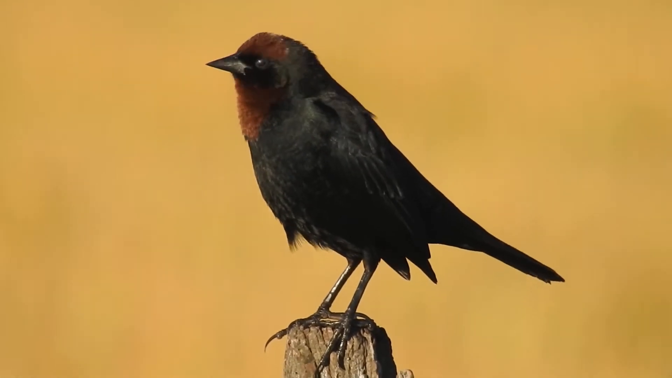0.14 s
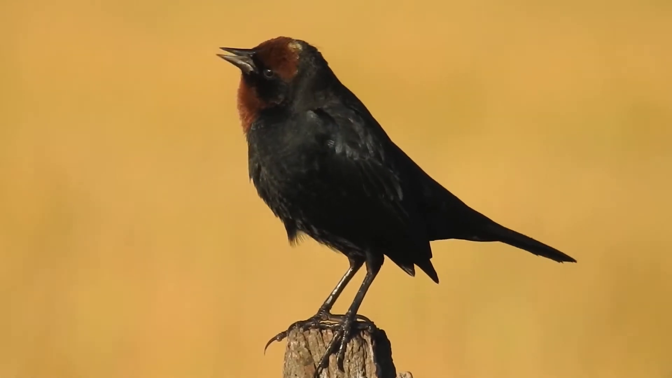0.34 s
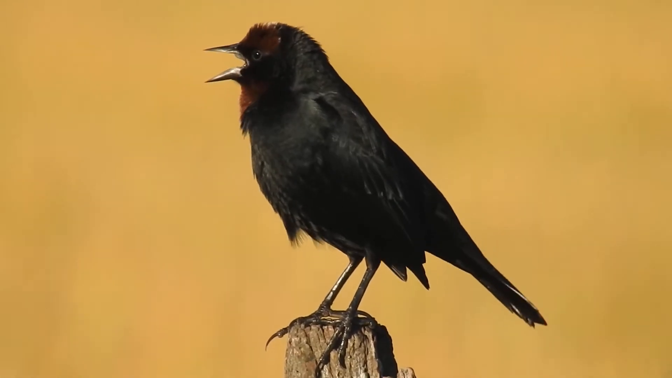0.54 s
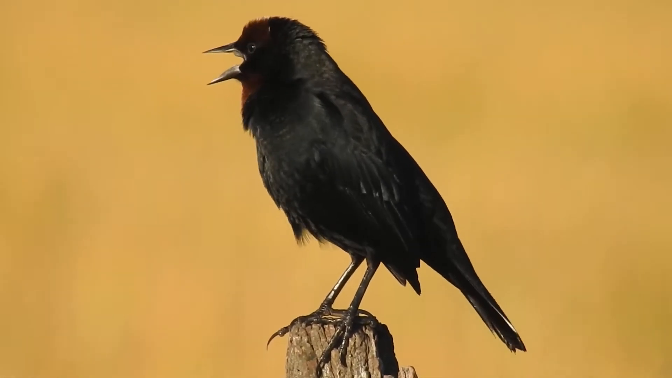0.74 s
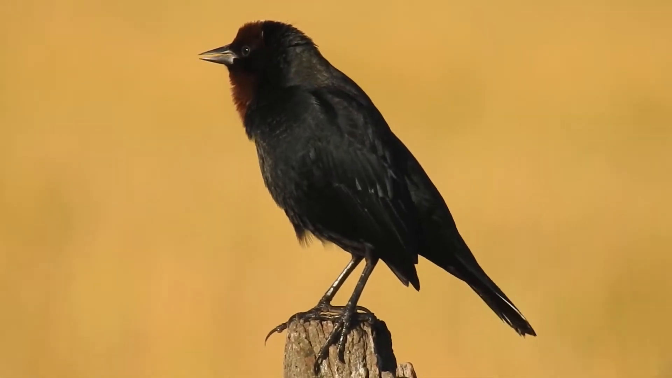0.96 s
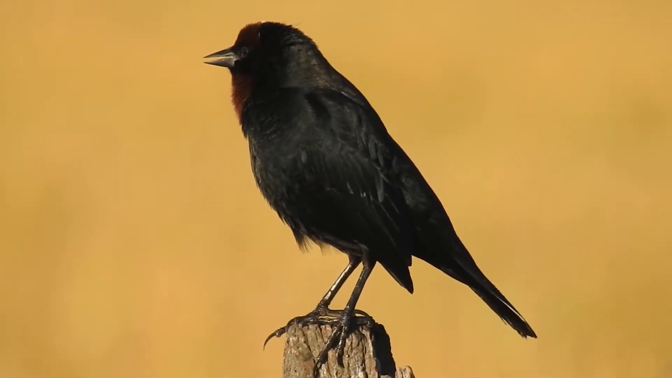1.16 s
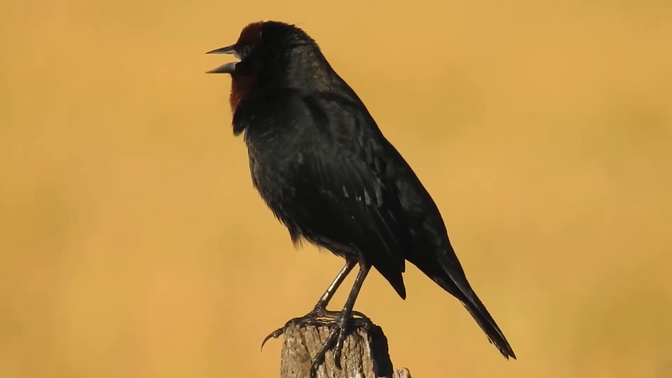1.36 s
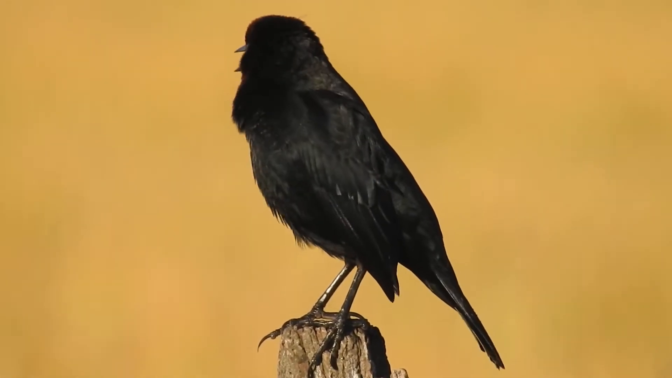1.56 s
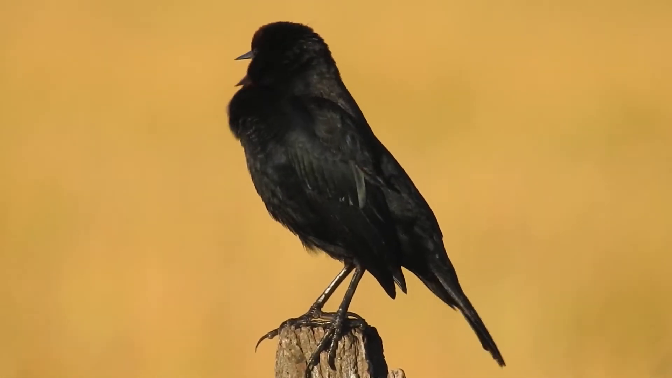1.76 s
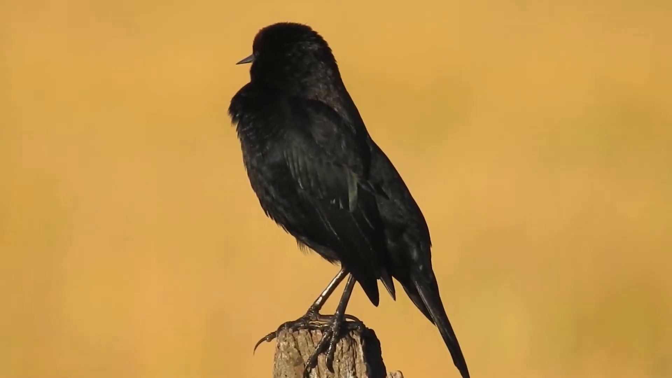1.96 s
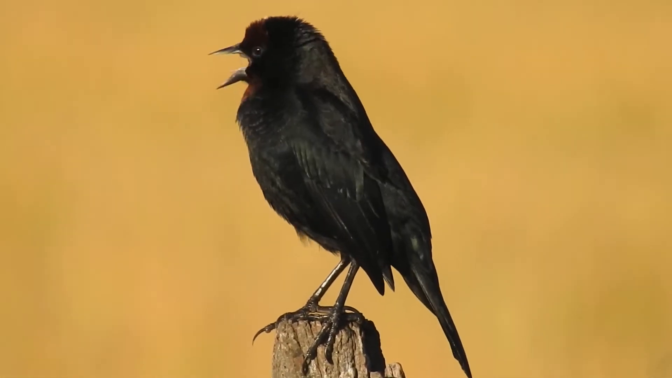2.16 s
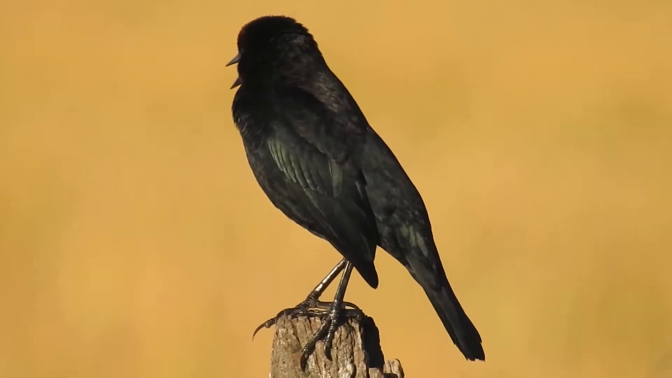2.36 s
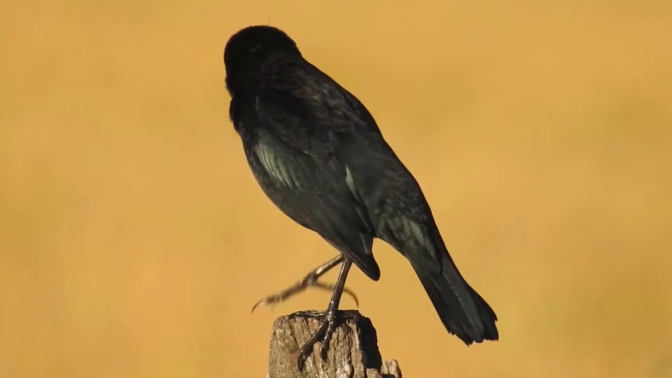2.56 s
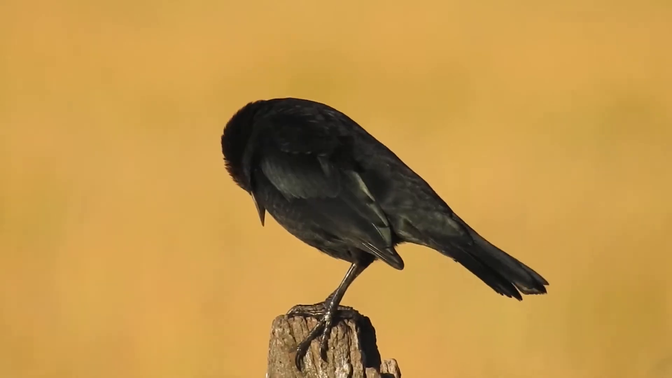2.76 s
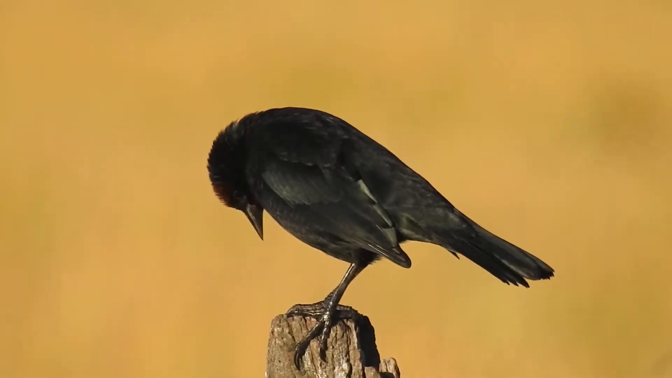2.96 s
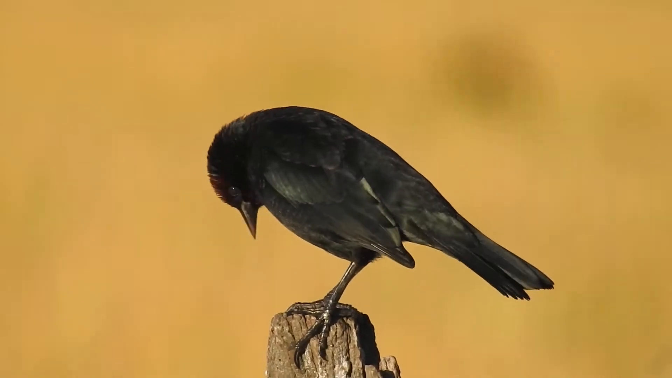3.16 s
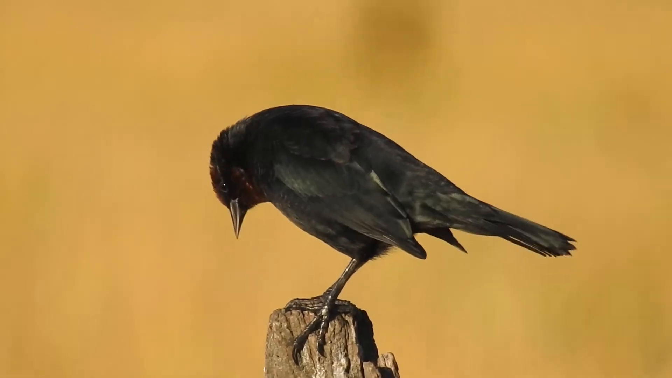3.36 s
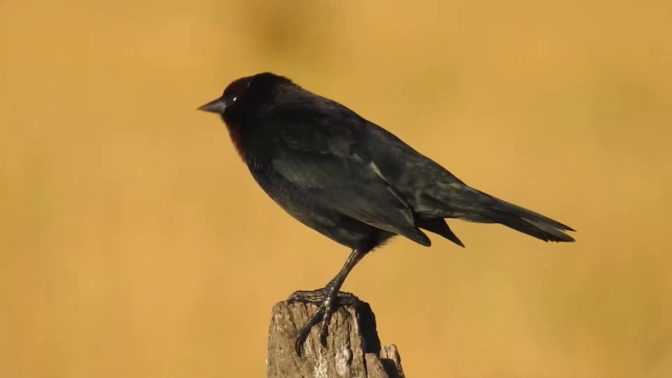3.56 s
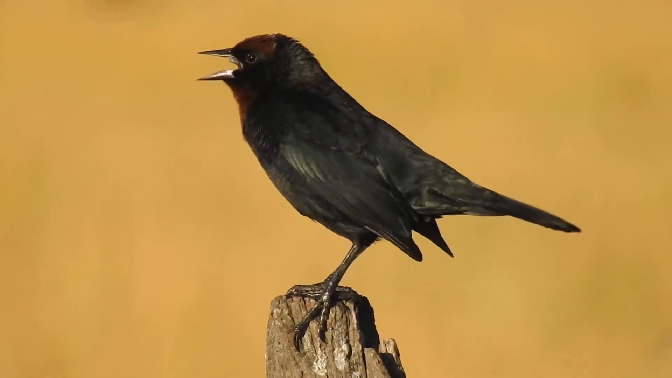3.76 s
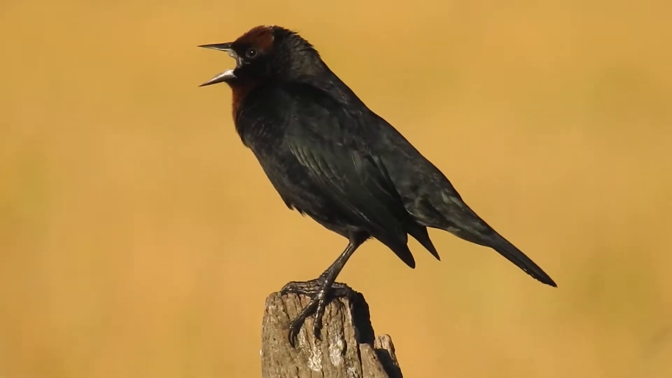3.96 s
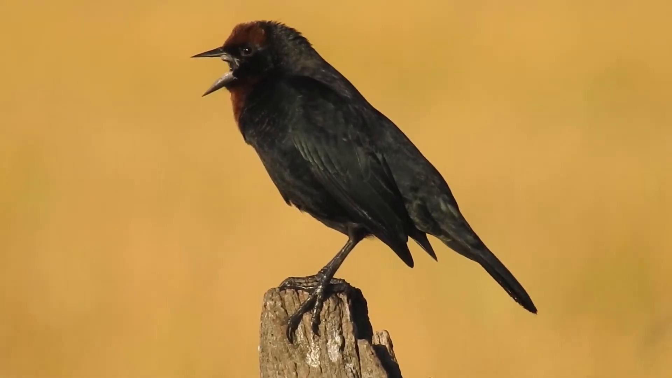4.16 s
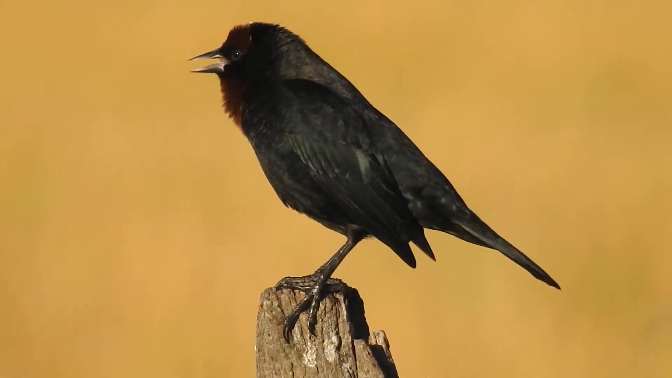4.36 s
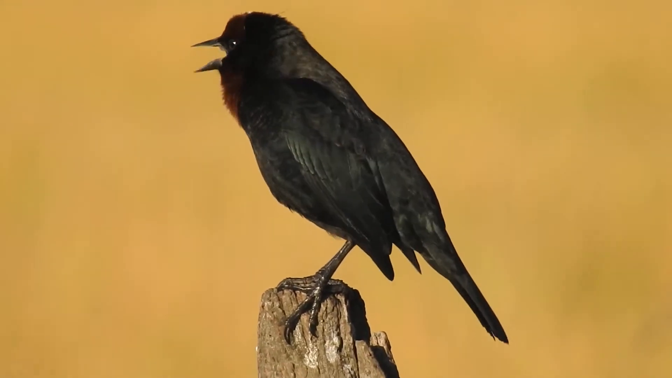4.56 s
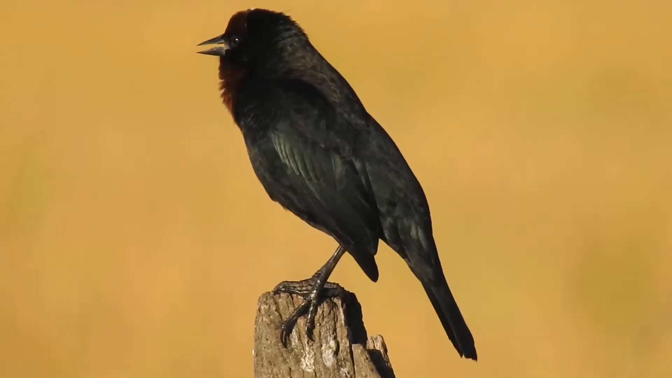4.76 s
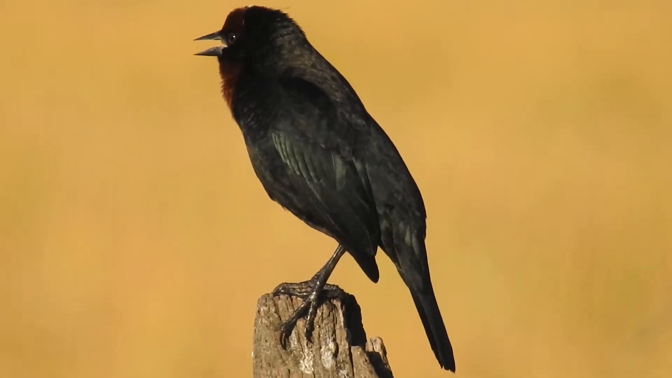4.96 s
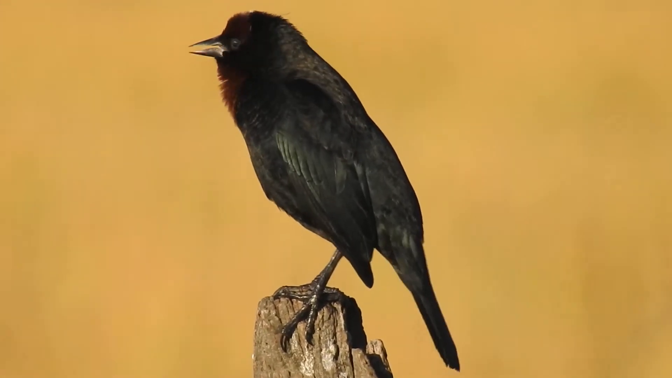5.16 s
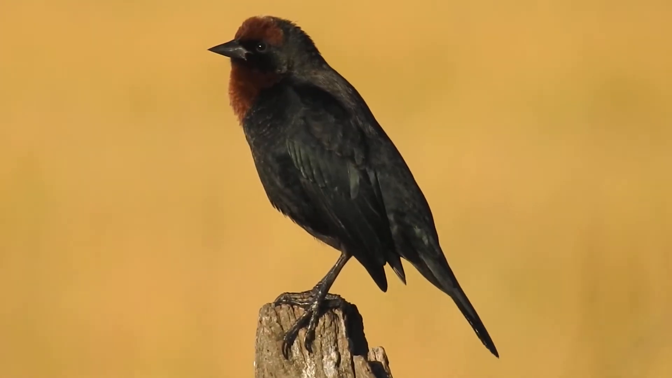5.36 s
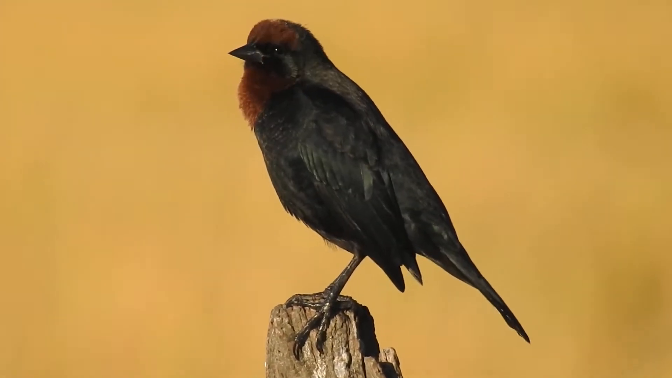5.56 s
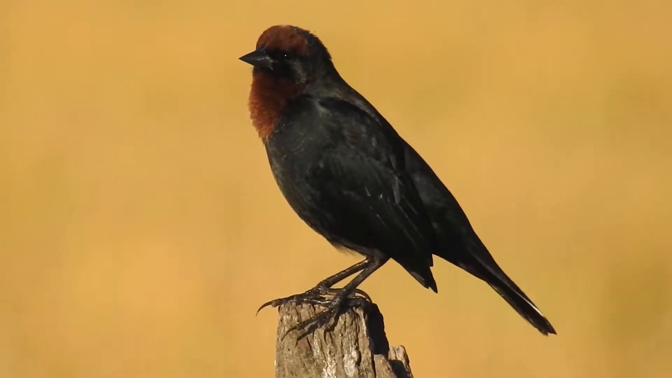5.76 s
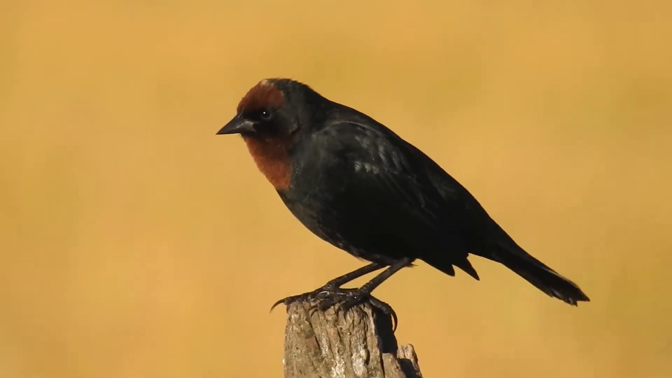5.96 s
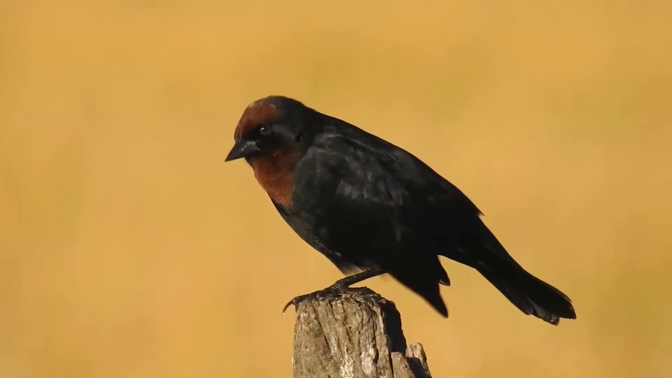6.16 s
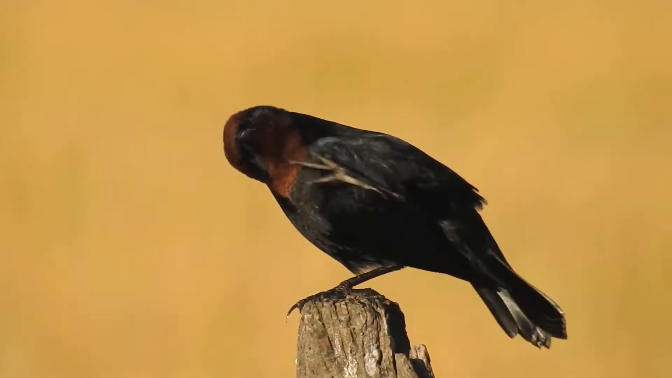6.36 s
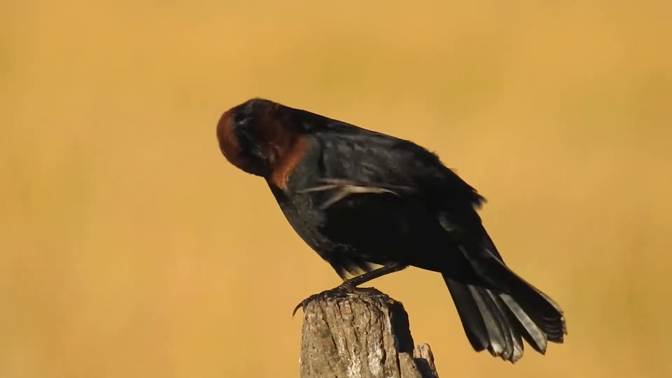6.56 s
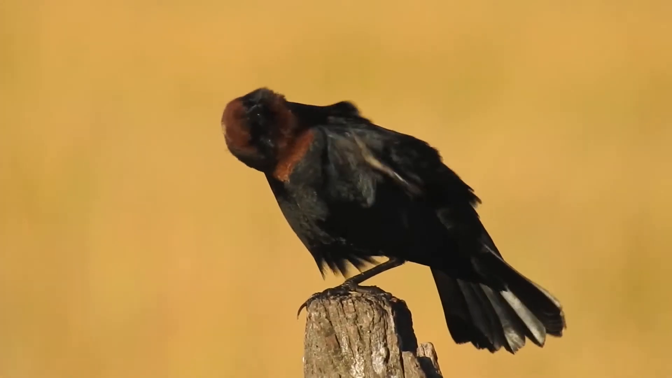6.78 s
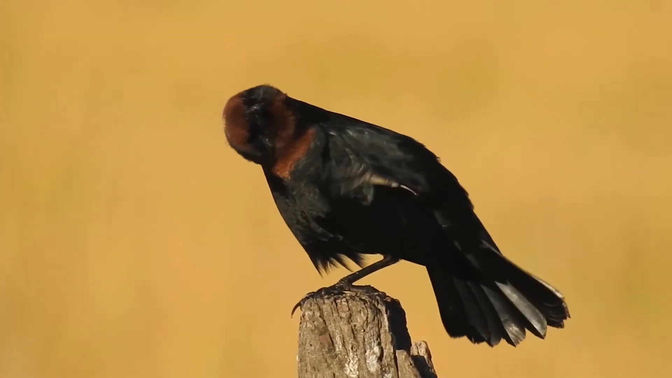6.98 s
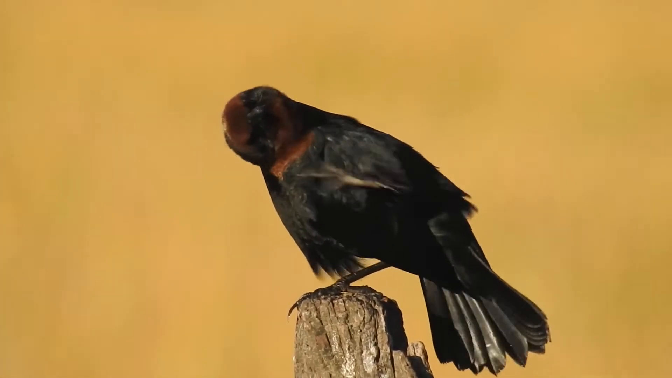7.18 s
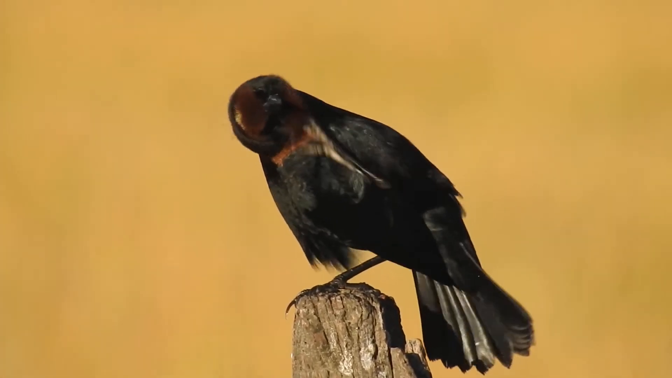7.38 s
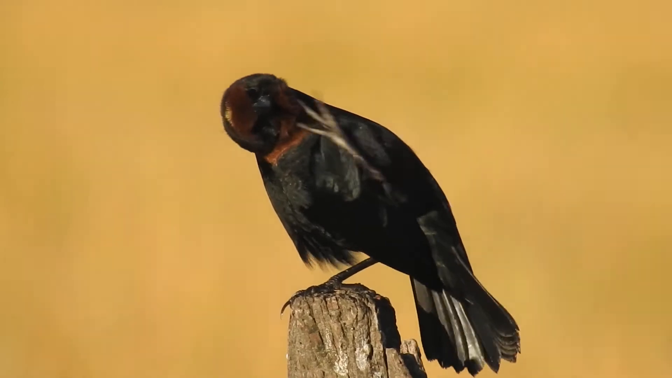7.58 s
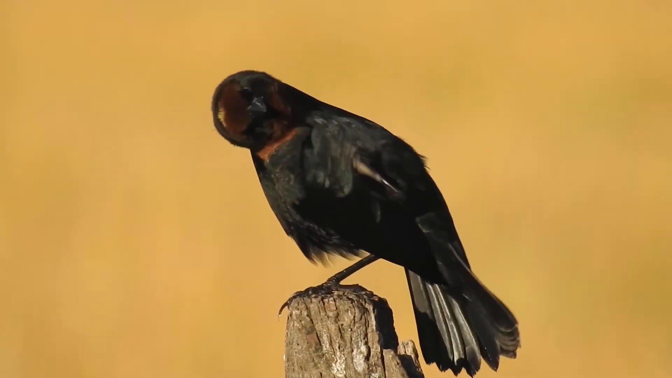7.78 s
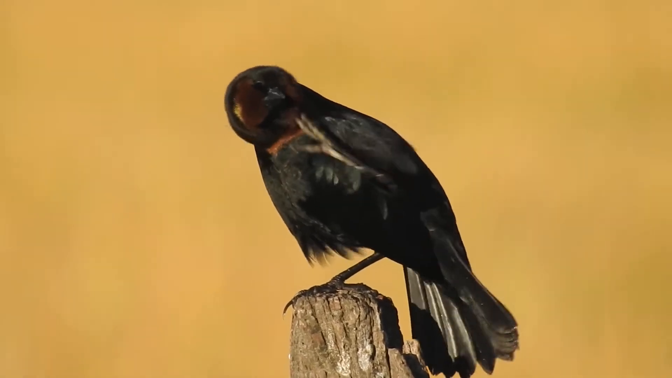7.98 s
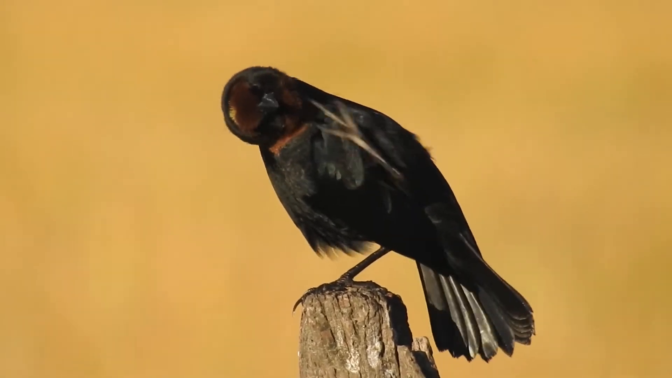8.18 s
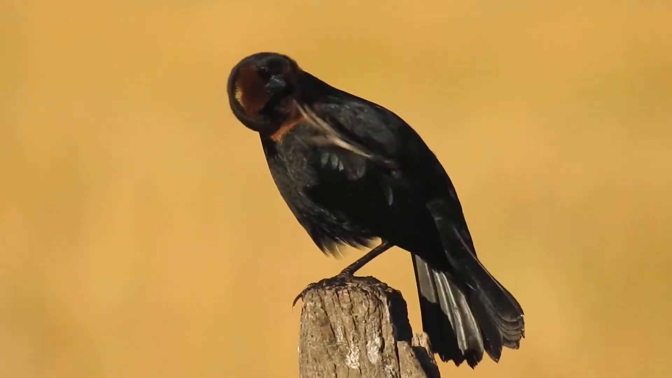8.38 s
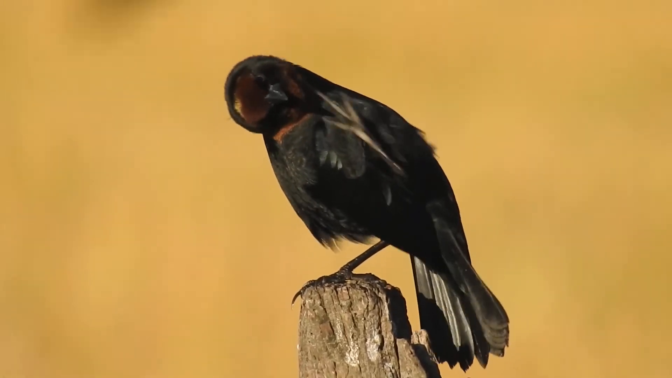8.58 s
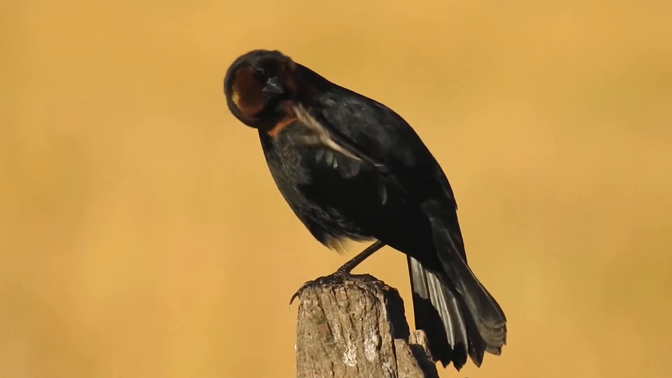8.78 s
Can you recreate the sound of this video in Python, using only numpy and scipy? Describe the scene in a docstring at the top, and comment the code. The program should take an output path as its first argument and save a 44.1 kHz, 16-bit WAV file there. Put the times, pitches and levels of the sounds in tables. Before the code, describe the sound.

A blackbird on a post sings two phrases of piercing whistles, brief sliding notes and rapid-pulsed buzzes, with another singer's soft peeps and swoops joining later. All around, small birds give irregular, high, slightly hoarse chirps and clipped rasps, some near and loud, many distant and blurred. Quiet field rumble, thin air hiss and light wind puffs; open-air stereo with a faint diffuse tail from grass.

```python
"""A blackbird on a fence post in open grassland sings two phrases: thin whistles, short slurs and a long
hissing buzz; a second singer joins. Whistles and slurs are fluttering tones, buzzes are pulses in a throat.
A flock chirps and rasps all around: near birds are placed call by call, farther ones scatter at random.
Under them lie a low far rumble, puffs of wind and thin hiss, all filtered noise, and a faint distant caller.
A stereo microphone hears it all, with a faint diffuse echo of the birds from grass and bushes."""
import sys
import numpy as np
from scipy import signal
from scipy.fft import rfft, irfft, next_fast_len
from scipy.io import wavfile
from scipy.ndimage import map_coordinates

SR = 44100
rng = np.random.default_rng(int(sys.argv[2]) if len(sys.argv) > 2 else 0)


def transcribe(signal):
    """Save signal, clipped to [-1, 1], as a 16-bit WAV file at the path in sys.argv[1]."""
    frames = np.atleast_2d(signal).T
    limited = np.clip(frames, -1, 1)
    pcm = np.round(limited * 32767).astype(np.int16)
    wavfile.write(sys.argv[1], SR, pcm)


N = 389403

# loudness of the farther flock, before each layer's own offset: (time [s], level [dB])
FAR_FLOCK_LEVEL = [(0, -40), (.4, -38.5), (.7, -35), (1.14, -40), (1.35, -34.5), (2.9, -37), (5, -36.5),
                   (5.6, -38.5), (6.6, -38), (7.7, -40), (8.83, -38.5)]
# colour of the hiss in a hoarse call: (frequency [Hz], level [dB])
HOARSE_HISS = [(600, -27), (1600, -16.5), (3000, -4.5), (6500, -4), (8000, -8), (10300, -18), (11600, -51)]
BUZZ_EDGE_S = 0.044  # attack and release of a buzz, outside its stated length


def amp(db):
    """Decibels to gain."""
    return 10 ** (np.asarray(db) / 20)


def unit(x):
    """Scale to rms 1."""
    return x / np.sqrt(np.mean(np.abs(x) ** 2) + 1e-20)


def along(points, hz):
    """Read (Hz, value) points at hz, straight lines on a log frequency axis."""
    f, v = np.transpose(points)
    return np.interp(np.log(hz + 1), np.log(f + 1), v)


def whole(rows):
    """A level curve over the whole scene."""
    return np.interp(np.arange(N) / SR, *np.transpose(rows))


def wobble(rate, n):
    """A smooth random curve of n samples, with rate knots a second."""
    knots = rng.standard_normal(int(n * rate / SR) + 4)
    return map_coordinates(knots, [np.arange(n) * rate / SR], order=2, mode="nearest")


def filtered(x, response):
    """x times a response of frequency."""
    n = x.shape[-1]
    m = next_fast_len(n + 1024)
    return irfft(rfft(x, m) * response(np.fft.rfftfreq(m, 1 / SR)), m)[..., :n]


def noise(spectrum, shape):
    """Coloured noise of rms 1."""
    white = rng.standard_normal(shape)
    return unit(filtered(white, lambda hz: amp(along(spectrum, hz))))


def spread(pair, side_db):
    """Two unrelated signals as the middle and sides of a wide sound."""
    return pair[0] + amp(side_db) * np.array([pair[1], -pair[1]])


def cycles(hz):
    """Running phase [rad] of a pitch curve."""
    return 2 * np.pi * np.cumsum(hz) / SR


def edges(t, attack_s, release_s):
    """Attack, hold and release over the times t."""
    return np.clip(t / attack_s, 0, 1) * np.clip((t[-1] - t) / release_s, 0, 1)


def add(out, s, x, pan_db=0, lag=0):
    """Mix mono x in from time s, pan_db louder at the left port, which hears it lag samples later."""
    start = round(s * SR)
    for port, i, db in zip(out, (start + lag, start), (pan_db / 2, -pan_db / 2)):
        part = x[max(-i, 0):max(N - i, 0)]
        port[max(i, 0):max(i, 0) + len(part)] += amp(db) * part


def grassland(air_db=-66):
    """Noise of the open field: far rumble, thin air hiss and puffs of wind; a distant caller gives slurs."""
    # colour of the rumble: (frequency [Hz], level [dB])
    rumble_colour = [(15, -33.5), (25, -26.5), (54, -10), (75, -10), (115, -5.5), (195, 1), (370, -5.5),
                     (666, -8.5), (757, -11), (1030, -10.5), (1150, -14), (2000, -14.5), (2600, -23.5),
                     (4400, -120)]
    # loudness of the rumble: (time [s], level [dB])
    rumble_level = [(0.0, -54.5), (5.11, -53), (8.48, -53.5), (8.83, -58.5)]
    # puffs of wind: (middle [s], Gaussian half length [s], level less 4 dB [dB], centre [Hz])
    puff_rows = [(0.456, 0.029, -59.5, 133), (.7, 0.036, -59.5, 79.5), (3.677, 0.051, -52.5, 177.5),
                 (4.396, 0.0675, -61, 81.5), (5.417, 0.028, -61, 68.7), (6.08, 0.11, -59.5, 197),
                 (7.489, 0.061, -48, 195)]
    # distant caller: (start [s], length [s], first pitch [Hz], last pitch [Hz], level [dB])
    caller_rows = [(3.423, 0.127, 1600, 1150, -55.5), (3.974, 0.22, 1346, 1294, -52.5),
                   (7.501, 0.29, 1370, 1224, -55)]
    rumble = spread(noise(rumble_colour, (2, N)), side_db=-7.0)
    rumble *= amp([[1], [-1]])  # the left port hears it 2 dB louder than the right
    out = amp(whole(rumble_level) + 1.76 * wobble(9.3, N)) * rumble
    out += amp(air_db) * noise([(1000, -16), (15000, -11.5)], (2, N))
    for s, half, db, hz in puff_rows:
        u = np.arange(-3 * half, 3 * half, 1 / SR) / half
        colour = [(hz / 6, -18), (hz / 2, -5), (hz, 0), (hz * 1.73, -14), (hz * 8, -40), (hz * 30, -80)]
        for pan_db in (12, -16):  # each microphone port is buffeted on its own
            puff = noise(colour, len(u))
            add(out, s - 3 * half, amp(db + 4) * np.exp(-u * u / 2) * puff, pan_db)
    for s, length, first_hz, last_hz, db in caller_rows:
        add(out, s, amp(db) * slur(length, first_hz, last_hz, octave_db=-18, rough=0.13))
    return out


def pulses(rate, jitter):
    """An uneven pulse train: for each sample, its pulse's number, its age in s and a smooth gate."""
    turns = cycles(rate * np.exp(jitter * wobble(700, len(rate)))) / (2 * np.pi)
    gate = unit(np.sin(np.pi * (turns % 1) ** 0.61) ** 2)
    return turns.astype(int), turns % 1 / rate, gate


def rasp(hz, half, rate_hz=470, jitter=.3, beat=0.9, scatter_db=3, chaos=0.0777, climb=.06,
         lower_db=-5, grows_db=4, hiss_db=-14):
    """Two climbing voices that lurch in pitch and beat unevenly, the lower one gaining towards the end."""
    # the upper and the lower voice: (share of the rasp's pitch [ratio])
    voice_shares = (1.07, .76)
    u = np.linspace(-4, 4, int(8 * half * SR))
    n = len(u)
    swell = 1 / np.cosh(.8 * u)
    voices = []
    for share in voice_shares:
        gate = pulses(np.full(n, rate_hz), jitter)[2]
        pitch = hz * share * (1 + climb * np.tanh(u) + chaos * wobble(650, n))
        strength = (1 - beat + beat * gate) * amp(scatter_db * np.minimum(wobble(450, n), 1))
        voices.append(unit(strength * np.sin(cycles(pitch))))
    tone = voices[0] + amp(lower_db + grows_db * np.minimum(u, 1)) * voices[1]
    hiss = amp(hiss_db) * noise(HOARSE_HISS, n) / np.sqrt(swell)
    return swell ** 2 * (tone + hiss)


def arch(top_hz, rise_s, fall_s, rise_db, fall_db, climb, drop):
    """The path of a chirp, its top in the middle: progress (-1 start, 0 top, 1 end), pitch and gain."""
    reach = 1.2  # the flanks run on past progress 1 to silence here
    n = int(max(rise_s, fall_s) * SR * reach)
    t = np.arange(-n, n) / SR
    u = np.minimum(np.where(t < 0, -t / rise_s, t / fall_s), reach)
    hz = top_hz * (1 - np.where(t < 0, climb, drop) * u ** 1.3)
    gain = amp(np.where(t < 0, rise_db, fall_db) * u) * (1 - (u / reach) ** 4)
    return np.sign(t) * u, hz, gain


def chirp(top_hz, rough, rise_s, fall_s, hiss_db=-17, shiver=0.078, clear_share=.2):
    """One rounded arch: the voice splits to half its pitch on the hoarse rise and clears at the top."""
    # partials of the split voice: (multiple of the pitch [ratio], level at hoarseness 1 [dB])
    split_partials = [(.5, -25.5), (1.5, -7.5), (2, -18)]
    u, hz, gain = arch(top_hz, rise_s, fall_s, rise_db=-13, fall_db=-5, climb=.38, drop=.165)
    n = len(u)
    hoarse = abs(rough) * (clear_share + (1 - np.tanh(4 * u + 1)) / 2)
    phase = cycles(hz * (1 + shiver * hoarse * wobble(1100, n) + .018 * wobble(170, n)))
    split = sum(amp(db) * np.sin(k * phase) for k, db in split_partials)
    shake = amp(9.2 * hoarse * np.minimum(wobble(600, n), 1) + 2.1 * wobble(214, n))
    tone = np.sqrt(2) * shake * (np.sin(phase) + hoarse * split)
    return gain * (tone + amp(hiss_db) * abs(rough) * noise(HOARSE_HISS, n))


def squeal(top_hz, rise_s, fall_s, octave_db=-4, hiss_db=-10):
    """A steep, gritty arch whose octave stands out on both flanks."""
    u, hz, gain = arch(top_hz, rise_s, fall_s, rise_db=-0.5, fall_db=-3, climb=0.37, drop=0.31)
    n = len(u)
    phase = cycles(hz * (1 + 0.032 * wobble(1400, n)))
    top = np.exp(-5 * u * u)
    tone = (top + 0.05) * np.sin(phase) + amp(octave_db) * (1.2 - top) * np.sin(2 * phase)
    grit = amp(2.7 * np.minimum(wobble(600, n), 1))
    return gain * (np.sqrt(2) * tone * grit + amp(hiss_db) * noise(HOARSE_HISS, n))


def placed(s, call, pan_db):
    """Centre a flock bird's call on time s; the left port hears it up to two samples late, at random."""
    return s - len(call) / SR / 2, call, pan_db, int(rng.choice([0, 1, 2, 2]))


def near_flock(onset_db=-6, onset_lead_s=0.019, onset_half_s=.006):
    """The nearest small birds: a rough chirp opens with a quick rising rasp, and some rasps come alone."""
    # arched chirps: (top [s], level [dB], top pitch [Hz], roughness [0-1], rise [s], fall [s],
    # left over right [dB])
    chirp_rows = [(0.026, -25.5, 5320, 0.5, 0.026, 0.018, 4), (0.294, -21.5, 5030, 0.38, 0.022, 0.012, 3.5),
                  (0.313, -16.5, 5004, 0.37, 0.022, 0.0231, 1.5),
                  (0.458, -23.5, 4970, 0.32, 0.014, 0.02, 2), (0.502, -22, 4920, 0.48, 0.021, 0.014, 1),
                  (0.552, -34.5, 4930, 0.2, 0.016, 0.014, 7), (0.626, -26.5, 5190, 0, 0.02, 0.021, 6),
                  (0.733, -26, 5540, 0, 0.022, 0.029, -4), (0.753, -27, 4890, 0.03, 0.016, 0.02, 5),
                  (0.826, -29, 4950, 0.15, 0.02, 0.014, 6), (1.05, -27, 5240, 0.53, 0.05, 0.026, 2),
                  (1.231, -31, 5030, 0.57, 0.022, 0.0096, 3),
                  (1.384, -25.5, 4680, 0.49, 0.032, 0.0114, -0.5),
                  (1.655, -27, 5128, 0.31, 0.031, 0.0127, 2), (1.698, -32.5, 5115, 0.1, 0.012, 0.02, 3),
                  (1.773, -14, 5325, 0.13, 0.016, 0.022, 1), (1.81, -32, 4960, 0.05, 0.016, 0.021, 1),
                  (1.86, -26, 4510, 0.2, 0.016, 0.015, 1), (1.941, -29, 4587, 0.26, 0.025, 0.013, 0.72),
                  (2.013, -22.5, 4610, 0.4, 0.016, 0.018, 1.5), (2.201, -20, 4860, 0.2, 0.024, 0.016, 3.5),
                  (2.366, -18, 4860, 0.22, 0.017, 0.013, 1.6), (2.575, -34, 5480, 0.3, 0.014, 0.016, 5),
                  (2.701, -21, 5310, 0.28, 0.018, 0.023, 2.5),
                  (2.737, -26.5, 4450, 0.65, 0.019, 0.013, 0.5), (2.795, -38.5, 4590, 0.1, 0.022, 0.012, 2),
                  (3.082, -32, 4740, 0.7, 0.02, 0.016, 1), (3.323, -33, 5460, 0.15, 0.019, 0.019, -3),
                  (3.152, -17.5, 5065, 0.62, 0.031, 0.02, 2), (3.494, -22, 5200, 0.25, 0.02, 0.023, 1.5),
                  (3.817, -33, 5370, 0, 0.016, 0.029, 0.9), (3.867, -32.5, 4770, 0.07, 0.018, 0.02, 0),
                  (3.911, -29.5, 5180, 0.07, 0.022, 0.023, 0.75), (4.074, -29, 5310, 0.17, 0.025, 0.017, 2),
                  (4.304, -7, 5096, 0.16, 0.013, 0.031, 1.8), (4.68, -27.5, 5120, 0.2, 0.014, 0.018, 1),
                  (4.824, -28, 5620, 0.18, 0.022, 0.016, 0), (4.952, -13.5, 5456, 0.5, 0.022, 0.0075, 2),
                  (5.057, -23.5, 5187, 0.08, 0.015, 0.0064, 0),
                  (5.425, -26.5, 5090, 0.4, 0.02, 0.0071, 6.5), (5.503, -27.5, 5220, 0, 0.016, 0.017, 1),
                  (6.207, -29, 5220, 0.1, 0.01, 0.021, 2.9), (6.25, -21.5, 4970, 0, 0.018, 0.0128, 0.93),
                  (6.73, -23.5, 4760, 0.45, 0.026, 0.012, 0.3),
                  (7.021, -34.5, 5080, 0.08, 0.016, 0.0144, 3), (7.533, -27, 4530, 0.66, 0.018, 0.015, 1.5),
                  (7.959, -34, 5200, 0.17, 0.012, 0.024, 2.5), (8.107, -23.5, 5240, 0.37, 0.014, 0.023, 3),
                  (8.258, -39, 5910, 0.3, 0.02, 0.032, 4), (8.373, -29.5, 4630, 0.2, 0.02, 0.013, 2),
                  (8.583, -21, 5010, 0.19, 0.032, 0.017, 2.5)]
    # harsh chips: (middle [s], level [dB], pitch [Hz], half length [s], left over right [dB])
    rasp_rows = [(0.008, -23.5, 5370, 0.0064, 2), (0.605, -36, 5400, 0.012, 4),
                 (1.027, -26, 4820, 0.013, 0.2), (1.294, -25.5, 5400, 0.01182, -0.23),
                 (1.342, -24.5, 5710, 0.012, 1), (2.063, -29, 5610, 0.0089, 0.7),
                 (2.206, -21.5, 5940, 0.0093, 0), (2.457, -35.5, 5930, 0.0088, 2),
                 (2.508, -32.5, 5980, 0.01, 0.3), (2.673, -31, 5420, 0.0082, 3),
                 (2.865, -29.5, 5450, 0.011, 1.5), (3.009, -36.5, 5730, 0.015, 2),
                 (3.521, -26.5, 5830, 0.011, -1), (4.582, -28, 5870, 0.01118, -0.54),
                 (4.66, -33.5, 5440, 0.0093, 0), (4.938, -14.5, 5445, 0.01054, 0),
                 (5.049, -20.5, 5780, 0.0065, -1), (5.341, -40, 5880, 0.016, 0),
                 (5.173, -37.5, 5900, 0.012, 0), (5.414, -28.5, 6060, 0.011, -2),
                 (5.725, -14.5, 5840, 0.0065, 0.5), (5.738, -19, 5883, 0.0096, 1.5),
                 (5.895, -26, 5760, 0.017, 0), (6.241, -22.5, 6450, 0.0096, 1),
                 (6.712, -30, 5320, 0.011, -0.5), (6.844, -32.5, 5550, 0.005, 3.2),
                 (7.11, -27.5, 5220, 0.011, 1), (7.512, -29, 4540, 0.0055, 2),
                 (7.876, -35, 5080, 0.0109, 0.3), (8.096, -24, 4630, 0.00836, 0),
                 (8.82, -25, 5580, 0.0071, 0.5)]
    # one squeal: (top [s], level [dB], top pitch [Hz], rise [s], fall [s], left over right [dB])
    squeal_row = (3.696, -19, 4300, .023, .02, 2.5)
    out = np.zeros((2, N))
    for s, db, hz, rough, rise_s, fall_s, pan_db in chirp_rows:
        add(out, *placed(s, amp(db) * chirp(hz, rough, rise_s, fall_s), pan_db))
        if rough > 0:
            onset = rasp(hz, onset_half_s, chaos=.035, climb=0.34, lower_db=-6, grows_db=1)
            add(out, *placed(s - onset_lead_s, amp(db + onset_db) * rough * onset, pan_db))
    for s, db, hz, half, pan_db in rasp_rows:
        add(out, *placed(s, amp(db) * rasp(hz, half), pan_db))
    s, db, *shape, pan_db = squeal_row
    add(out, *placed(s, amp(db) * squeal(*shape), pan_db))
    return out


def far_chirp(top_hz, rise_s, fall_s, lean_db, split_db=-12, shiver=0.023, flutter_db=3):
    """A distant chirp that leans to one flank; a second voice a fifth higher joins its rise."""
    u, hz, gain = arch(top_hz, rise_s, fall_s, rise_db=-5, fall_db=-6, climb=.29, drop=.18)
    n = len(u)
    phase = cycles(hz * (1 + shiver * wobble(500, n)))
    fifth = (1 - np.tanh(3 * u)) / 2 * np.sin(1.5 * phase)
    tone = np.sin(phase) + amp(split_db) * fifth
    return unit(gain * amp(lean_db * u + flutter_db * wobble(300, n)) * tone)


def far_flock(count=850, chirp_db=-11.5, top_hz=4550, blur_db=-17):
    """Many birds farther off chirp at random and overlap, over a faint blur of wavering coloured noise."""
    # colour of the blur: (frequency [Hz], level [dB])
    blur_colour = [(1200, -37.5), (2400, -3), (3300, -7), (4600, -1.5), (5600, -8), (6600, -1),
                   (8200, -15.5), (10000, -22.5), (11000, -54.5)]
    out, level = np.zeros((2, N)), whole(FAR_FLOCK_LEVEL)
    draws = rng.uniform(0, 1, (count, 7))
    for k, (when, place, side, pitch, rise, fall, lean) in enumerate(draws):
        s = (k + 4 * when) % count / count * (N - 1) / SR
        distance = np.sqrt(.15 + 4 * place)  # relative; level falls as one over it
        hz = top_hz * np.exp(.45 * (pitch - .5))
        call = far_chirp(hz, .008 + .016 * rise, .006 + .016 * fall, 24 * lean - 13)
        gain = amp(level[int(s * SR)] + chirp_db) / distance
        add(out, s - len(call) / SR / 2, gain * call, 0.97 + 9 * (side - .5), lag=round(2 * side))
    blur = spread(noise(blur_colour, (2, N)), side_db=-2)
    return out + amp(level + blur_db + wobble(17, N)) * blur


def far_rasps(count=70, over_db=-8, centre_hz=5500, half_s=0.0092):
    """Farther birds rasp softly, at random."""
    out, level = np.zeros((2, N)), whole(FAR_FLOCK_LEVEL) + over_db
    for k, (when, loud, pitch, length, side) in enumerate(rng.uniform(-1, 1, (count, 5))):
        s = (k + .5 + when / 2) / count * (N - 1) / SR
        hz, half = centre_hz * np.exp(.13 * pitch), half_s * np.exp(0.52 * length)
        call = rasp(hz, half, chaos=0.059, climb=.13)
        add(out, *placed(s, amp(level[int(s * SR)] + 2.6 * loud) * call, 1.9 + 6 * side))
    return out


def whistle(hz, db, rough, quaver_hz=150, waver=0.046, quaver_db=14, drift=0.0068):
    """A long thin note that quavers as it turns rough; the beak sets how much of its octave gets out."""
    # how well the octave radiates: (frequency of the octave [Hz], level [dB])
    beak_response = [(8500, -30), (9000, 2), (9450, -1.5), (10000, -10.5), (10500, -29), (11400, -43),
                     (14000, -66)]
    n = len(hz)
    phase = cycles(hz * (1 + waver * rough * wobble(2 * quaver_hz, n) + drift * wobble(22, n)))
    swell = np.minimum(wobble(quaver_hz, n), 1)  # rises are capped, dips are not
    quaver = amp((1.95 + quaver_db * rough) * swell)
    octave = amp(along(beak_response, 2 * hz)) * np.sin(2 * phase)
    return np.sqrt(2) * quaver * amp(db) * (np.sin(phase) + octave)


def accented(note, leap_hz, drop_s, steep, accent_db, accent_s, accent_half_s, rough, release_s):
    """A whistle that bursts out above its pitch, drops and sags; it roughens after the burst, then settles."""
    _, length, hz, sag, db, fade = note
    t = np.arange(int(length * SR)) / SR
    pitch = hz - sag * t + leap_hz / (1 + (t / drop_s) ** steep)
    accent = np.exp(-((t - accent_s) / accent_half_s) ** 4)
    hoarse = rough * np.clip((t - accent_s) / (2 * accent_half_s), 0, 1) * (1 - t / length)
    level_db = db + fade * t + accent_db * accent
    return edges(t, 0.0078, release_s) ** 2 * whistle(pitch, level_db, hoarse)


def warble(thread_db=-50, glide=0.027, rough=0.11, lead_s=0.19):
    """One high thread of tone swells several times, sliding down through each swell."""
    # swells: (middle [s], pitch [Hz], level [dB], half length [s])
    swell_rows = [(1.435, 6330, -29, 0.0054), (1.558, 6650, -19.5, 0.012), (1.699, 6750, -22.5, 0.013),
                  (1.824, 7218, -38, 0.0029)]
    s, hz, db, half = np.transpose(swell_rows)
    t = np.arange(s[0] - lead_s, s[-1] + lead_s / 2, 1 / SR)
    u = (t - s[:, None]) / half[:, None]
    slide = (u * np.exp(-u * u / 14)).sum(0) / 2
    pitch = np.interp(t, s, hz) * (1 - glide * slide)
    strength = amp(thread_db) + amp(db) @ (1 / np.cosh(np.clip(u, -20, 20)))
    return t[0], edges(t - t[0], .02, .02) * strength * whistle(pitch, 0, rough)


def syrinx(hz, rough, octave_db, flutter_hz=520, swing=0.24, shake_db=8):
    """A tone whose pitch and strength flutter irregularly as the membranes turn rough."""
    n = len(hz)
    phase = cycles(hz * (1 + swing * rough * np.tanh(wobble(2 * flutter_hz, n))))
    shake = np.minimum(wobble(flutter_hz, n), 1)
    strength = unit(amp(shake_db * np.sqrt(np.abs(rough)) * shake))
    return np.sqrt(2) * strength * (np.sin(phase) + amp(octave_db) * np.sin(2 * phase))


def slur(length, first_hz, last_hz, octave_db, rough=0.074, bow=1.0, late=1):
    """A gliding note that swells and fades; late above 1 delays its peak."""
    u = np.linspace(0, 1, int(length * SR))
    pitch = first_hz + (last_hz - first_hz) * u ** bow
    return np.abs(np.sin(np.pi * u ** late)) * syrinx(pitch, rough, octave_db, shake_db=9.5)


def swoop(first_hz=5400, last_hz=3120, length_s=.105, steep=5.2, knee=0.43):
    """A note that plunges in an S-curve and trails off on its low tail."""
    u = np.linspace(0, 1, int(length_s * SR))
    pitch = last_hz + (first_hz - last_hz) * (1 - np.tanh(steep * (u - knee))) / 2
    return np.abs(np.sin(np.pi * u ** 0.927)) ** 1.9 * syrinx(pitch, 0.088, -31, shake_db=15)


def short_notes():
    """Notes of the fluttering syrinx: two-voiced motifs, runs of peeps and swoops, and single slurs."""
    # a two-voiced slur, then a held note: (start [s], held pitch [Hz], level of each slur voice [dB],
    # held level [dB], held length [s], held sag [Hz])
    motif_rows = [(4.486, 4664, -35.5, -28.5, .13, 59.6), (4.78, 4500, -31.5, -21.5, .12, 255),
                  (5.056, 4369, -35, -22.5, 0.083, 339)]
    # a run of soft, nearly flat notes: (start [s], length [s], first pitch [Hz])
    peep_rows = [(5.772, 0.0297, 3890), (5.92, 0.039, 3910), (6.041, 0.0777, 4010), (6.171, 0.063, 4100),
                 (6.323, 0.054, 3990), (6.385, 0.068, 3767)]
    # a run of swoops that level out: (start [s], level [dB])
    swoop_rows = [(7.3, -37), (7.452, -32.5), (7.586, -39.5), (7.731, -44.5), (7.87, -46.5)]
    # single slurred notes: (start [s], length [s], first pitch [Hz], last pitch [Hz], level [dB])
    slur_rows = [(1.462, 0.00813, 3693, 3560, -23.5), (1.6, 0.016, 3760, 3600, -23),
                 (2.51, 0.0086, 5730, 5640, -23), (4.473, 0.0124, 5220, 5040, -26),
                 (4.548, 0.038, 5290, 4770, -29.5), (4.773, 0.0069, 5180, 4870, -25),
                 (6.461, 0.019, 4370, 4050, -34), (6.501, 0.015, 5950, 5630, -35.5),
                 (6.515, 0.037, 8600, 6510, -39), (6.565, 0.036, 4770, 4270, -37),
                 (6.595, 0.043, 5630, 5420, -36), (6.631, 0.036, 7860, 6750, -37),
                 (6.654, 0.033, 7260, 6560, -33), (6.802, 0.443, 4720, 4660, -44),
                 (7.367, 0.211, 5350, 5470, -37.5), (8.616, 0.14, 4760, 4600, -39)]
    voice_s, voice_fall = 0.052, 0.852  # length, last over first pitch
    held_after_s = 0.082  # the held note follows the start of the slur
    peep_fall, peep_db = 0.96, -34.5  # last over first pitch, level
    out = np.zeros((2, N))
    for s, hz, slur_db, held_db, length, sag in motif_rows:
        for share, octave_db in zip((0.77, 0.96), (-9, -32)):  # first pitch as a share of the held one
            first_hz = share * hz
            voice = slur(voice_s, first_hz, voice_fall * first_hz, octave_db, rough=0.047, bow=1.4, late=1.15)
            add(out, s, amp(slur_db) * voice)
        held = slur(length, hz + sag / 2, hz - sag / 2, octave_db=-27.0, rough=0.047, late=1.085)
        add(out, s + held_after_s, amp(held_db) * held)
    for s, length, hz in peep_rows:
        add(out, s, amp(peep_db) * slur(length, hz, peep_fall * hz, octave_db=-30))
    for s, db in swoop_rows:
        add(out, s, amp(db) * swoop())
    for s, length, first_hz, last_hz, db in slur_rows:
        add(out, s, amp(db) * slur(length, first_hz, last_hz, octave_db=-39.0))
    return out


def effort(length, db, rate, low_hz, peak_s, sizzle_db):
    """Over a buzz the pulses slow and the low resonance sinks; the sizzle swells once and lifts the buzz."""
    slows, sinks = 0.92, 0.81  # last over first pulse rate and resonance
    swell_s, push_db = 0.16, 3  # half length of the swell, lift of the whole buzz at its peak
    t = np.arange(int((length + 2 * BUZZ_EDGE_S) * SR)) / SR
    u = t / t[-1]
    push = np.exp(-((t - BUZZ_EDGE_S - peak_s) / swell_s) ** 2)
    gain = edges(t, BUZZ_EDGE_S, BUZZ_EDGE_S) ** 2 * amp(db + push_db * push)
    return rate * slows ** u, gain, low_hz * sinks ** u, sizzle_db - 18 * (1 - push)


def buzz(row, low_db=0, breathy=0.99, partner=1.86, partner_db=-6):
    """Rapid, nearly even pulses ring a sinking low resonance and the upper throat, with a sizzle on top."""
    # upper resonances: (centre [Hz], width before a 1.5-fold widening [Hz], signed gain [ratio])
    throat_rows = [(4720, 140, 6), (5040, 190, -1), (6050, 110, 3.5), (6820, 400, 4.5)]
    # colour of the sizzle: (frequency [Hz], level [dB])
    sizzle_colour = [(6000, -23), (7800, -6.5), (8500, 12), (10000, -1), (10800, -48), (12000, -78)]
    rate, gain, low_hz, sizzle_db = effort(*row)
    n = len(rate)
    index, age, gate = pulses(rate * (1 + .012 * wobble(30, n)), .032)
    phase = 2 * np.pi * low_hz * age  # the ringing starts afresh with each pulse
    ringing = np.sin(phase) + amp(partner_db) * np.sin(partner * phase)
    low = unit(gate * ringing * amp(1.1 * wobble(300, n)))
    clicks = unit(np.diff(index, prepend=0))
    drive = clicks + breathy * gate * rng.standard_normal(n)

    def throat(f):
        """Sum of the upper resonances, each passed twice."""
        return sum(g * (1j * f * w * 1.5 / (c * c - f * f + 1.5j * f * w)) ** 2 for c, w, g in throat_rows)

    upper = unit(filtered(drive, throat))
    sizzle = amp(sizzle_db) * gate * noise(sizzle_colour, n)
    return gain * (unit(upper + amp(low_db) * low) + sizzle)


def blackbirds():
    """Whistles, slurs and buzzes of the two singers."""
    # long whistles, sinking and level: (start [s], length [s], pitch [Hz], sag [Hz/s],
    # level outside the accent [dB], level slope [dB/s])
    sinking_note = (.454, .53, 5230, 1550, -29, -28.5)
    level_note = (3.819, .59, 6240, 60, -30, -3)
    # buzzes: (start after the attack [s], length [s], level before the swell [dB], first pulse rate [Hz],
    # first low resonance [Hz], time until the sizzle peaks [s], peak sizzle [dB], low over upper [dB])
    buzz_rows = [(1.873, .76, -41, 438.3, 3770, 0.323, -12, 0.7),
                 (6.788, .5, -51, 498, 3900, 0.319, -15.5, 5)]
    out = short_notes()
    sinking = accented(sinking_note, leap_hz=587, drop_s=0.06, steep=3.0, accent_db=18.0, accent_s=0.02,
                       accent_half_s=0.029, rough=0.084, release_s=0.01)
    add(out, sinking_note[0], sinking, pan_db=-3.5)
    add(out, *warble(), pan_db=5.5, lag=1)
    level = accented(level_note, leap_hz=743, drop_s=0.04, steep=12, accent_db=16, accent_s=0.035,
                     accent_half_s=0.022, rough=0.52, release_s=0.116)
    add(out, level_note[0], level, pan_db=7)
    for s, *row, low_db in buzz_rows:
        add(out, s - BUZZ_EDGE_S, buzz(row, low_db=low_db), pan_db=4.0)
    return out


def scatter(x):
    """Grass and bushes return a faint diffuse tail: noise that dies away at its own rate in each band."""
    # decay of the tail: (frequency [Hz], time to fall 60 dB [s])
    decay_times = [(500, 0.22), (4000, 0.24), (10000, 0.095)]
    hz, t, z = signal.stft(rng.standard_normal((2, SR // 2)), SR, nperseg=256)
    decay = amp(-60 * t / along(decay_times, hz)[:, None])
    tail = signal.istft(z * decay, SR, nperseg=256)[1]
    return signal.fftconvolve(x.mean(0)[None], tail / np.linalg.norm(tail[0]), axes=1)[:, :N]


def scene(flock_wet_db=-18, song_wet_db=-16, far_wet_db=-10):
    """All the birds, their echo (stronger for the far ones) and the open field."""
    near, far, song = near_flock(), far_flock() + far_rasps(), blackbirds()
    echo = scatter(amp(flock_wet_db) * near + amp(far_wet_db) * far + amp(song_wet_db) * song)
    return near + far + song + echo + grassland()


def record(dry):
    """The microphone dulls the top treble; nothing passes the band limit."""
    top_hz = 15750
    treble = [(10200, -0.5), (11500, -8.0), (15000, -7)]  # (frequency [Hz], level [dB])
    return filtered(dry, lambda hz: amp(along(treble, hz)) * (hz < top_hz))


dry = scene()
out = record(dry)
transcribe(out)
```